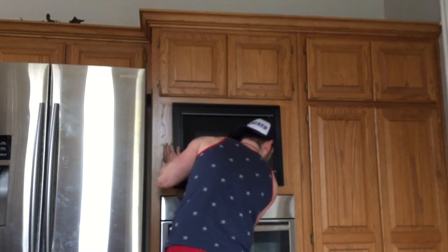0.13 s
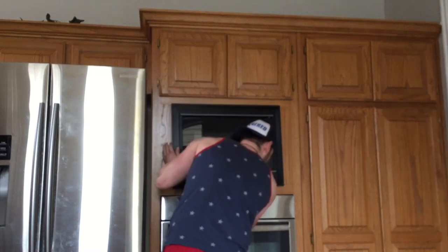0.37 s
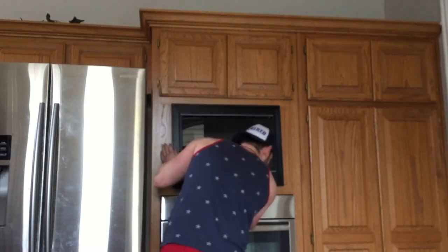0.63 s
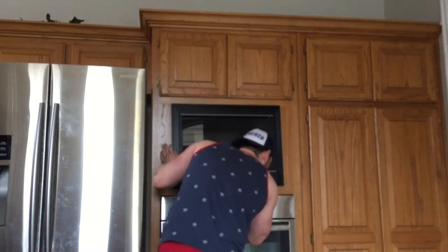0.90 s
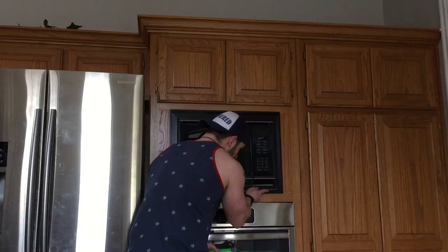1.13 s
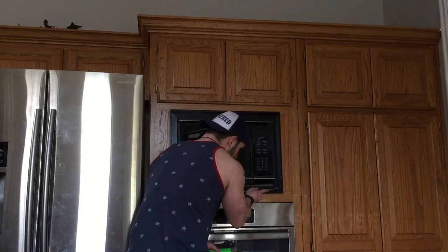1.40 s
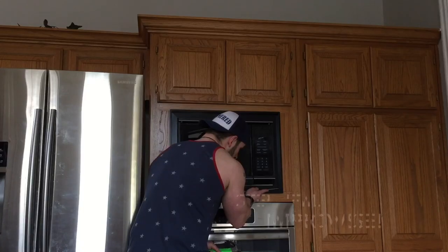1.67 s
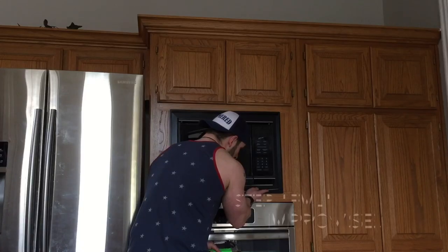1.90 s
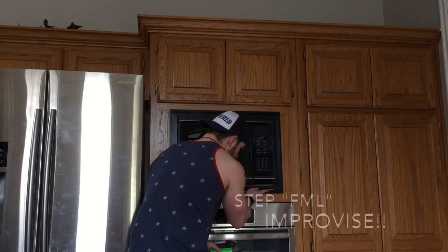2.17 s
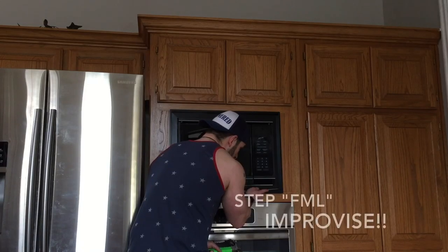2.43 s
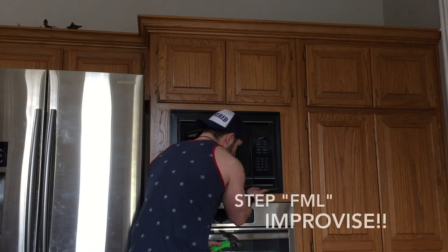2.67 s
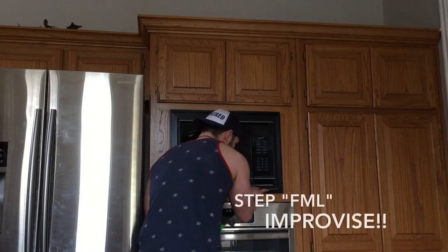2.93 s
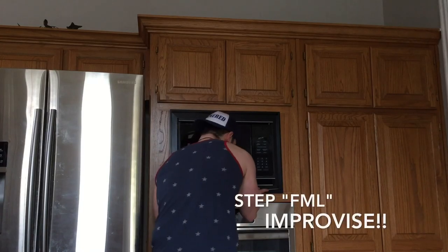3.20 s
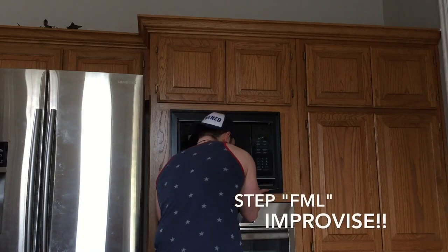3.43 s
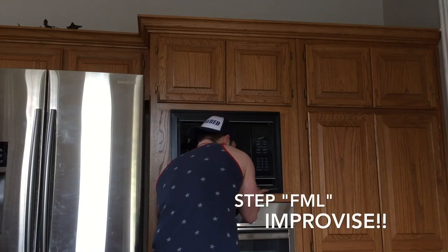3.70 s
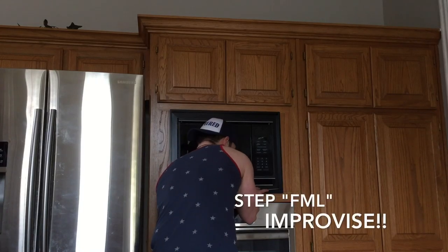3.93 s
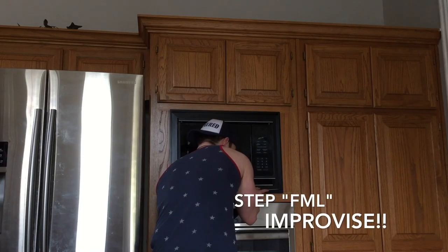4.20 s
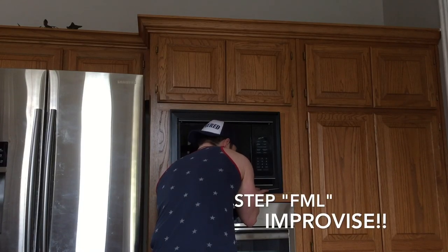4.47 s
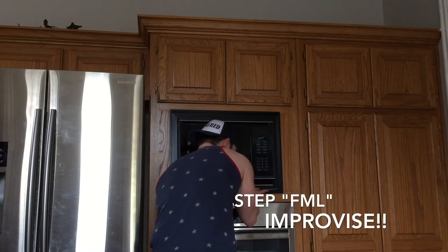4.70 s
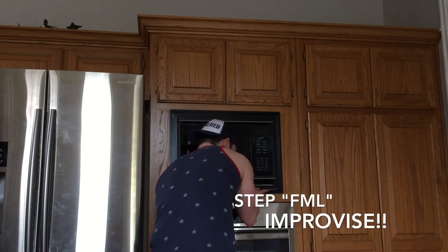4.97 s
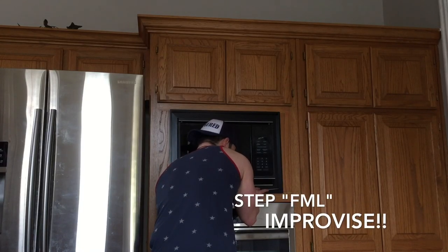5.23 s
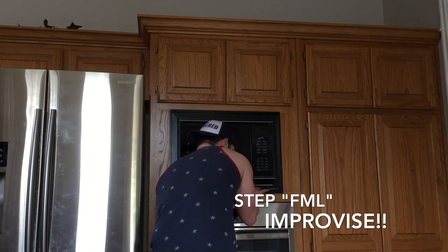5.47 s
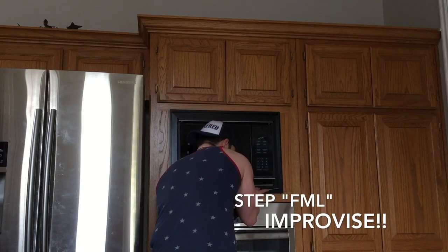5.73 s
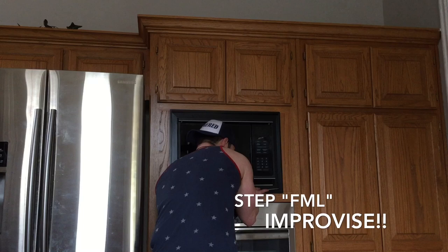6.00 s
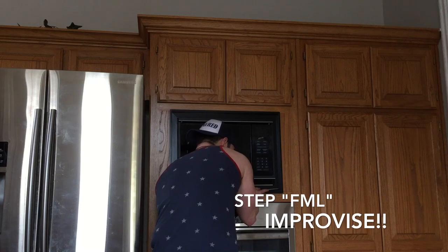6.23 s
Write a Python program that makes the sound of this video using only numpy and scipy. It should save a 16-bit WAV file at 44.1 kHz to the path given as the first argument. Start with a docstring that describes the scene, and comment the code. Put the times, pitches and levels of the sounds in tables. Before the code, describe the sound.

In a roomy kitchen, faint sliding and small metal-on-wood taps lead to a tool set down and loud, boxy, uneven hammer strikes.

```python
"""A hammer drives a screwdriver against a nail inside a wooden kitchen cabinet: each contact sends a click
through tuned resonances of box, panels, handle and steel, followed by echoes in the cabinet and the kitchen.
Before the blows, something slides on the shelf (uneven noise), light taps set the tip, and a steel tool is
put down (ringing tones and a knock). Soft noises of cloth and floor, room tone and one low hum lie behind.
The level dips briefly to near silence just after one second and comes back higher."""
import sys
import numpy as np
from scipy import signal
from scipy.fft import rfft, irfft, next_fast_len
from scipy.io import wavfile
from scipy.ndimage import map_coordinates

SR = 44100
rng = np.random.default_rng(int(sys.argv[2]) if len(sys.argv) > 2 else 0)


def gain_from_db(level_db):
    """Convert decibel levels to linear amplitude factors (20 dB per decade)."""
    decades = np.asarray(level_db, float) / 20
    return 10 ** decades


def store_pcm(level_fs):
    """Save levels as 16-bit WAV."""
    pcm = np.round(np.clip(level_fs, -1, 1) * 32767).astype(np.int16)
    wavfile.write(sys.argv[1], SR, np.atleast_2d(pcm).T)


N = 280917  # length in samples

# All table levels are relative: later steps scale the sounds further.
# room tone and microphone hiss: f/Hz, level/dB per Hz
AIR_TONE = [(15, -41), (25, -9), (55, -1), (103, 2), (349, -7), (433, -11.5), (1470, -18), (2270, -19),
            (4020, -21.5), (4860, -24.5), (5880, -23.5), (9080, -27), (10400, -28.5), (15200, -28),
            (16500, -44)]
AIR_DB = -72
# a soft tone that swells once: t/s at full level, level/dB, hold/s, rise/s and fall/s per 20 dB
HUM_SWELL = (2.53, -63, .05, .12, .11)
HUM_HZ = 322

# cloth brushing past: t/s at full level, level/dB, hold/s, rise/s and fall/s per 20 dB
BRUSH_SWELL = (2.95, -61, .03, .15, .11)
# colour of the cloth noise: f/Hz, level/dB per Hz
BRUSH_TONE = [(900, -120), (2200, 3), (8000, -4), (12000, -6.5), (15000, -12), (16500, -16)]
# weight shifting on the floor: t/s at full level, level/dB
SHIFTS = [(0.0, -63), (.71, -62), (.81, -58), (.92, -63), (3.085, -60), (3.43, -68)]
# colour of the floor noise: f/Hz, level/dB per Hz
SHIFT_TONE = [(18, -47), (30, -13), (64, 1.5), (156, -9.5), (195, 6.5), (238, -13.5), (347, -10),
              (500, -23.5), (650, -52.5), (1100, -120)]
SHIFT_HOLD_S, SHIFT_RISE_S, SHIFT_FALL_S = .03, .08, .22  # rise and fall per 20 dB

# colour of the slide's low rumble: f/Hz, level/dB per Hz
SLIDE_RUMBLE_TONE = [(18, -47), (30, -6), (86, -1), (187, 2.5), (246, -6), (294, 3), (600, -17), (780, -40),
                     (1320, -120)]
# colour of the slide's rasp: f/Hz, level/dB per Hz
SLIDE_RASP_TONE = [(290, -28), (500, -9), (553, -18), (718, -4), (784, -11), (1180, -3.5), (1280, -12.5),
                   (2390, -13), (3920, -27), (6420, -34), (16000, -49)]
# rise and fall of the rumble: t/s at full level, level/dB, hold/s, rise/s and fall/s per 20 dB
RUMBLE_SWELL = (.41, -36, .05, .18, .22)
# rise and fall of the rasp: t/s at full level, level/dB, hold/s, rise/s and fall/s per 20 dB
RASP_SWELL = (.32, -44, .12, .08, .17)

# ringing tones of the loose steel tool: f/Hz, level/dB, time to fall 60 dB/s
TOOL_MODES = [(184, 1.5, .4), (1777, -15, .55), (1827, -16, .5), (3779, -27, .3), (4581, -31, 0.25),
              (6751, -24, 0.55), (9109, -31, 0.24), (9300, -33, 0.29)]
# the tool lands: t/s, ring level/dB, knock level/dB, thump level/dB
TOOL_DOWN = (2.728, -31, -11, -38)
# resonances of the hollow counter: f/Hz, width/Hz, level/dB
COUNTER = [(270, 80, 5), (430, 90, 4), (570, 100, 0), (915, 150, -8), (1830, 130, 1.5), (2250, 300, -8),
           (2900, 700, -17), (3800, 300, -14), (4600, 300, -15), (6500, 2500, -21), (12000, 6000, -25)]

# how long the kitchen's echoes last: f/Hz, time to fall 60 dB/s
KITCHEN_DECAY = [(150, 0.46), (400, 0.54), (800, 0.67), (1300, 0.69), (2400, .66), (3200, 0.58),
                 (4200, .64), (6500, .55), (8000, .44), (10500, .36), (13000, .3), (16000, .25)]
# standing waves of the kitchen: f/Hz, level/dB, time to fall 60 dB/s
ROOM_MODES = [(117.9, -1.5, .65), (195, -2.5, .5), (247.8, -3, .4), (297.4, -3, 0.22)]
# shudder of the cabinet's carcass: f/Hz, level/dB per Hz
THUMP_TONE = [(20, -40), (45, -8), (65, 0), (100, -6), (150, -12), (250, -40), (500, -120)]

# resonances of the hollow cabinet: f/Hz, width/Hz, level/dB
BOX = [(201, 39.4, -1.5), (267.8, 47, 0), (354.7, 52.4, 1.5), (452, 52.5, -7)]
# resonances of shelf and walls: f/Hz, width before damping/Hz, level/dB
PANEL = [(620, 110, -6.5), (790, 68, -5.5), (1057, 110, -8), (1241, 90, -2.5), (1440, 162, -5),
         (1665, 250, -14), (2250, 500, -13)]
# resonances of handle and shaft: f/Hz, width before damping/Hz, level/dB
EDGE = [(1880, 200, -9), (2314, 200, 5), (2700, 400, -6), (3050, 400, -5.5), (3536, 370, -6),
        (4156, 350, -5)]
# resonances of steel on steel: f/Hz, width before damping/Hz, level/dB
CRACK = [(4870, 1400, -4), (5800, 600, 1.5), (6500, 830, -3), (8300, 1200, -6.5), (10000, 1280, -8.5),
         (11700, 1200, -10), (14380, 3000, -15)]
# ringing tones of the hammer head: f/Hz, level/dB, time to fall 60 dB/s
HAMMER_MODES = [(4070, -4, 0.056), (5790, -5, .15), (6760, -15, .65), (8200, -9, .14), (10050, -10, .15),
                (11830, -23.5, .15)]
# light taps that set the tip:
# t/s, panel level/dB, pitch of the struck spot f/Hz, edge level/dB re panel, steel crack level/dB re panel
TAPS = [(0.786, -45, 1950, -5, -22), (1.078, -38.5, 830, -20, -20.5), (1.143, -45, 700, -35, -45),
        (1.207, -36.5, 1200, -3, -20), (1.355, -37.5, 1220, -9, -20.5), (1.416, -32.5, 1180, -1, -17),
        (1.918, -39, 880, -15, -42), (2.018, -49, 720, -27, -33), (2.071, -35, 1090, -21, -36)]
# hammer contacts, with the grazes before and the rebounds after the blows:
# t/s, panel level/dB, pitch of the struck spot f/Hz, box boom level/dB re panel, crack level/dB re panel
BLOWS = [(4.051, -18.5, 1300, -10, -30), (4.065, -6, 1440, 0, -17), (4.460, -27, 1950, -9, -22),
         (4.473, -21.5, 1150, -6.5, -26), (4.805, -44, 907, -8, -34), (5.39, -41, 1143, -8, -24),
         (5.412, -1.5, 1234, -4.5, -12), (5.902, -7.5, 1160, 2.5, -18), (6.201, -3, 1240, 1, -15),
         (6.254, -15.5, 1420, -9, -26)]
TAP_BOOM_DB, BOOM_DB_PER_OCTAVE = -4, -11  # boom re panel at an 800 Hz spot; lower spots boom more
BLOW_EDGE_DB, EDGE_PER_CRACK = -5.5, .3  # the shaft rings more as the contact gets harder
TAP_SWELL_S, BLOW_SWELL_S = .008, .005  # how slowly the echoes inside the cabinet build and fade
TAP_DAMPING, BLOW_DAMPING = .6, 1.2  # widths times this: a firm grip under the blows damps them
SPOT_SCATTER_DB = 1.8  # every contact stirs the resonances in new proportions

DIP_S, DIP_LENGTH_S, DIP_DB = 1.022, .028, -35
FADE_OUT_S, FADE_IN_S = .004, .022
GAIN_BEFORE_DB, GAIN_AFTER_DB = 2.5, 5  # before and after the dip


def unit(x):
    """Scaled to rms 1."""
    return x / np.sqrt(np.mean(x ** 2) + 1e-20)


def energy(x):
    """Scaled so that the squares add up to 1."""
    return x / np.linalg.norm(x)


def along(points, hz):
    """Reads between (frequency, value) points on a log frequency axis."""
    f, v = np.transpose(points)
    return np.interp(np.log(hz + 1), np.log(f + 1), v)


def filtered(x, response):
    """Multiplies each frequency in x by a complex response."""
    m = next_fast_len(len(x) + 8192)  # spare room at the end for the filter's tail
    hz = np.fft.rfftfreq(m, 1 / SR)
    return irfft(rfft(x, m) * response(hz), m)[:len(x)]


def noise(spectrum, size=N):
    """Random noise coloured by a spectrum, at rms 1."""
    white = rng.standard_normal(size)
    return unit(filtered(white, lambda hz: gain_from_db(along(spectrum, hz))))


def wobble(rate):
    """A smooth random curve with this many random knots a second."""
    knots = rng.standard_normal(int(N * rate / SR) + 4)
    return map_coordinates(knots, [np.arange(N) * rate / SR])


def swell(s, db, hold_s, rise_s, fall_s):
    """Gain that climbs 20 dB in rise_s, holds, then sinks 20 dB in fall_s."""
    t = np.arange(N) / SR - s
    steps_down = np.maximum(-t / rise_s, (t - hold_s) / fall_s)
    return gain_from_db(db - 20 * np.maximum(steps_down, 0))


def ring(modes, t, scatter_db):
    """Freely ringing tones that die away, each struck at a slightly random strength."""
    total = 0
    for hz, db, t60 in modes:
        fading = gain_from_db(db + scatter_db * rng.normal() - 60 * t / t60)
        total = total + fading * np.sin(2 * np.pi * hz * t)
    return total


def body(peaks, top_hz, damping=1, scatter_db=0):
    """Power per Hz (sum 1) of a set of resonances, falling steeply above top_hz."""
    f = np.arange(SR // 2 + 1)
    centre, width, db = np.transpose(peaks)[..., None]
    db = db + scatter_db * rng.standard_normal(db.shape)
    friction = f * width * damping
    peak = gain_from_db(db) * friction / (centre * centre - f * f + 1j * friction)
    power = (abs(peak) ** 2).sum(0) / (1 + (f / top_hz) ** 2) ** 2
    return power / power.sum()


def struck(power):
    """One second of response to a click: it has this power spectrum and starts at once (minimum phase)."""
    cepstrum = irfft(np.log(power + 1e-16) / 2)
    # folding the negative-time half onto the positive half lets nothing sound before the click
    cepstrum[1:SR // 2] *= 2
    cepstrum[SR // 2 + 1:] = 0
    return irfft(np.exp(rfft(cepstrum))) * SR / np.sqrt(2 * SR)


def thump(t, t60):
    """Low shudder made of noise: it builds over a few hundredths of a second and dies unevenly."""
    return (1 - np.exp(-t / .02)) * gain_from_db(-60 * t / t60) * noise(THUMP_TONE, size=len(t))


def kitchen(x, build_s):
    """Random kitchen echoes that build up, each frequency dying at its own speed."""
    hz, t, z = signal.stft(rng.standard_normal(len(x)), SR, nperseg=256)
    fading = gain_from_db(-60 * t / along(KITCHEN_DECAY, hz)[:, None])
    tail = signal.istft(z * fading, SR, nperseg=256)[1][:len(x)]
    tail = tail * (1 - np.exp(-np.arange(len(tail)) / SR / build_s))
    return signal.fftconvolve(x, energy(tail))[:len(x)]


def rattled(knock, t, swell_s, wet_db):
    """A knock heard directly, spread by dense echoes inside the cabinet and carried on by the kitchen."""
    echoes = energy(t * np.exp(-t / swell_s) * rng.standard_normal(len(t)))
    inside = signal.fftconvolve(knock, echoes)[:len(t)]
    return gain_from_db(-14) * knock + inside + gain_from_db(wet_db) * kitchen(knock, build_s=.8 * swell_s)


def air():
    """Room tone as slightly unsteady noise, and one soft swell of a low sine tone."""
    sine = np.sin(2 * np.pi * HUM_HZ * np.arange(N) / SR)
    hum = np.sqrt(2) * swell(*HUM_SWELL) * sine
    return gain_from_db(AIR_DB + 0.27 * wobble(13)) * noise(AIR_TONE) + hum


def movement():
    """Cloth brushes past and the floor takes the worker's weight: swells of coloured noise."""
    weight = sum(swell(s, db, SHIFT_HOLD_S, SHIFT_RISE_S, SHIFT_FALL_S) for s, db in SHIFTS)
    return swell(*BRUSH_SWELL) * noise(BRUSH_TONE) + weight * noise(SHIFT_TONE)


def slide():
    """Something slides over the shelf: an uneven rasp and a separately wavering low rumble."""
    wavering = gain_from_db(1.5 * wobble(30.2))
    rumble = unit(wavering * noise(SLIDE_RUMBLE_TONE))
    unevenness = gain_from_db(1.8 * wobble(60) + 1.3 * wobble(400))
    rasp = unit(unevenness * noise(SLIDE_RASP_TONE))
    return swell(*RUMBLE_SWELL) * rumble + swell(*RASP_SWELL) * rasp


def tool():
    """A loose steel tool lands on the hollow counter; each of its tones swells over a few cycles, then rings."""
    out, t = np.zeros(N + SR), np.arange(SR) / SR
    s, ring_db, knock_db, thump_db = TOOL_DOWN
    rings = sum((1 - np.exp(-t * mode[0] / 7)) * ring([mode], t, scatter_db=1.5) for mode in TOOL_MODES)
    rings = rings + gain_from_db(-5) * kitchen(rings, build_s=.004)
    knock = rattled(struck(body(COUNTER, top_hz=15000)), t, .005, wet_db=.7)
    sound = gain_from_db(ring_db) * rings + gain_from_db(knock_db) * knock + gain_from_db(thump_db) * thump(t, t60=.7)
    out[round(s * SR):][:SR] = sound
    return out[:N]


def contact(s_db, spot_hz, boom_db, edge_db, crack_db, swell_s, damping):
    """One contact knocks box, panels, handle and hammer head, and shakes the carcass and the room's air."""
    t = np.arange(SR) / SR
    loose = dict(damping=damping, scatter_db=SPOT_SCATTER_DB)
    boom = body(BOX, top_hz=500)
    # wood passes little treble, steel passes much more
    panel = body(PANEL + [(spot_hz, 180, 1.5)], top_hz=2050, **loose)
    edge = body(EDGE, top_hz=5150, **loose)
    crack = body(CRACK, top_hz=13980, **loose)
    power = panel + gain_from_db(boom_db) ** 2 * boom + gain_from_db(edge_db) ** 2 * edge + gain_from_db(crack_db) ** 2 * crack
    hammer = energy(ring(HAMMER_MODES, t, scatter_db=3))
    knock = struck(power) + gain_from_db(crack_db - 11) * hammer
    # standing waves need a few crossings of the room to build
    standing = (1 - np.exp(-t / 0.03)) * ring(ROOM_MODES, t, scatter_db=3.0)
    # harder contacts bring proportionally more of the low shaking
    low = gain_from_db(boom_db - 35 + 0.21 * s_db) * (standing + gain_from_db(-1.5) * thump(t, t60=.45))
    spread = gain_from_db(s_db + 14.5)  # echoes spread the knock's energy over tens of milliseconds
    return spread * (rattled(knock, t, swell_s, wet_db=.6) + low)


def contacts():
    """The light taps and the hammer blows, each placed at its time."""
    out = np.zeros(N + SR)
    for s, db, spot_hz, edge_db, crack_db in TAPS:
        boom_db = TAP_BOOM_DB + BOOM_DB_PER_OCTAVE * np.log2(spot_hz / 800)
        tap = contact(db, spot_hz, boom_db, edge_db, crack_db, TAP_SWELL_S, TAP_DAMPING)
        out[round(s * SR):][:SR] += tap
    for s, db, spot_hz, boom_db, crack_db in BLOWS:
        edge_db = BLOW_EDGE_DB + EDGE_PER_CRACK * crack_db
        blow = contact(db, spot_hz, boom_db, edge_db, crack_db, BLOW_SWELL_S, BLOW_DAMPING)
        out[round(s * SR):][:SR] += blow
    return out[:N]


def scene():
    """Everything in the kitchen, heard by one microphone."""
    return (air() + movement() + slide() + tool() + contacts())[None]


def band_limit(x):
    """A steep low-pass at the top of the band."""
    return signal.sosfilt(signal.butter(12, 16300, fs=SR, output="sos"), x)


def record(dry):
    """The microphone loses the deepest bass, the level dips briefly, and the loudest peaks are rounded off."""
    x = filtered(dry[0], lambda hz: (1j * hz / (45 + 1j * hz)) ** 2)[None]  # two bass cuts at 45 Hz
    s = DIP_S + np.array([-FADE_OUT_S, 0, DIP_LENGTH_S, DIP_LENGTH_S + FADE_IN_S])
    db = [GAIN_BEFORE_DB, DIP_DB, DIP_DB, GAIN_AFTER_DB]
    x = x * gain_from_db(np.interp(np.arange(N) / SR, s, db))
    x = x / (1 + np.abs(x / .97) ** 6) ** (1 / 6)  # bends smoothly towards a ceiling of 0.97
    return band_limit(x)


dry = scene()
out = record(dry)
store_pcm(out)
```